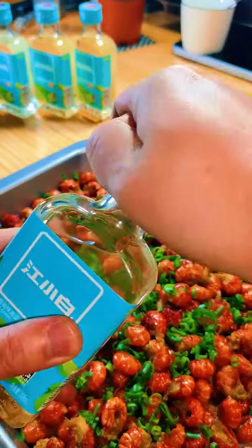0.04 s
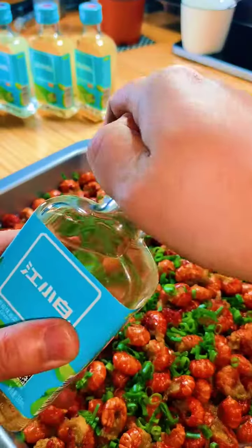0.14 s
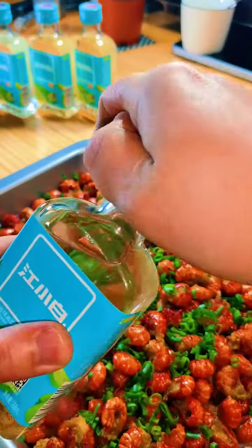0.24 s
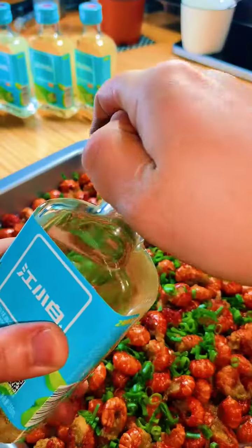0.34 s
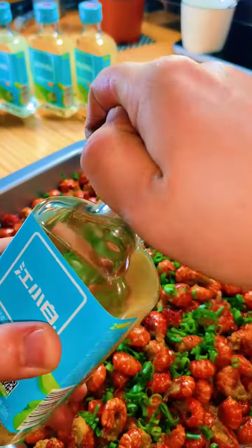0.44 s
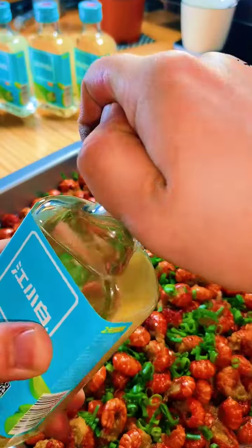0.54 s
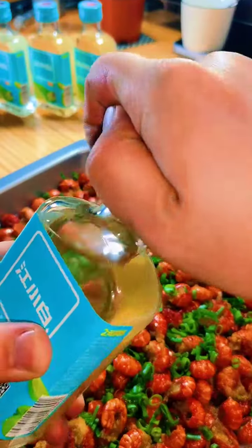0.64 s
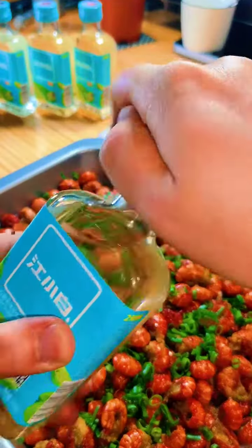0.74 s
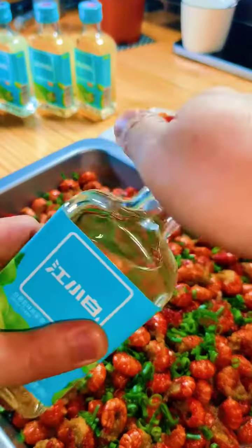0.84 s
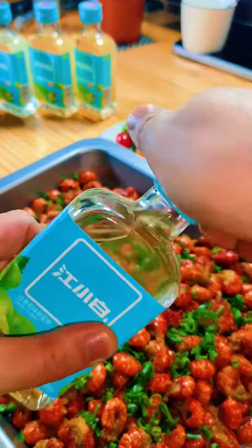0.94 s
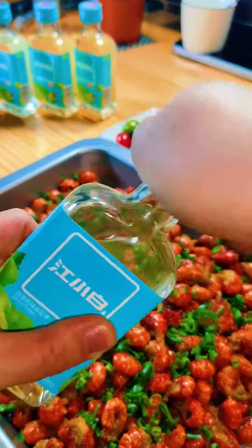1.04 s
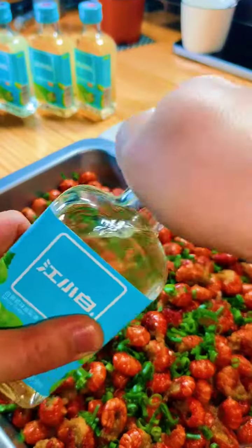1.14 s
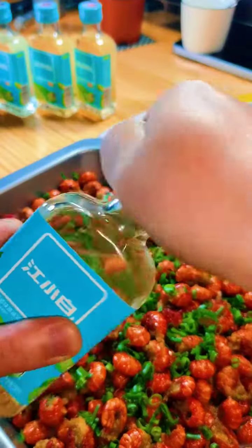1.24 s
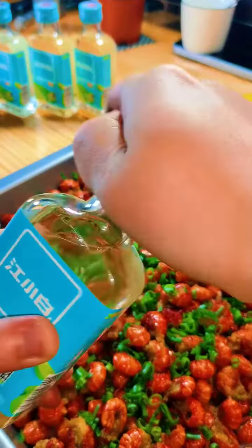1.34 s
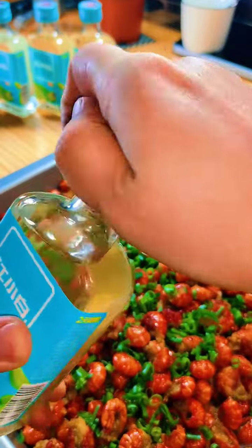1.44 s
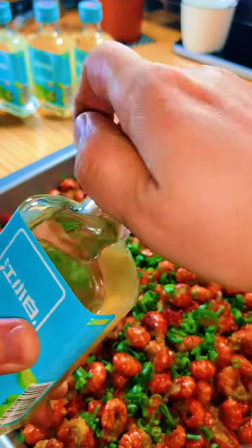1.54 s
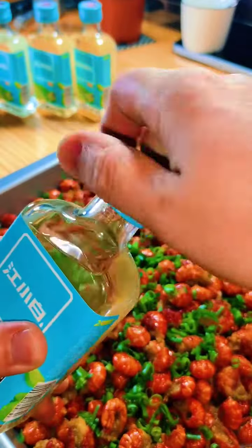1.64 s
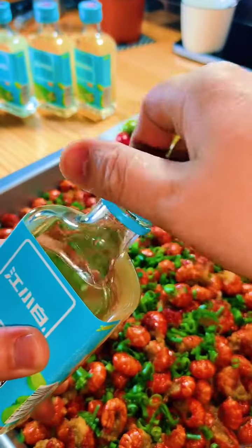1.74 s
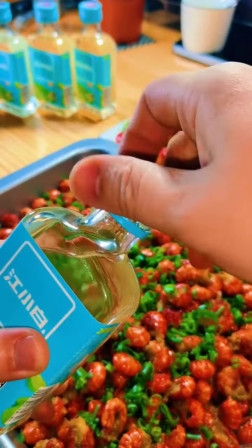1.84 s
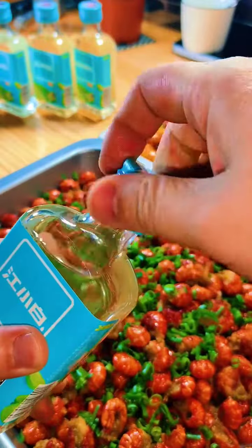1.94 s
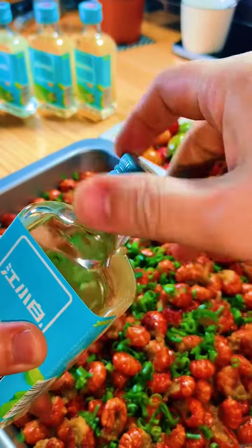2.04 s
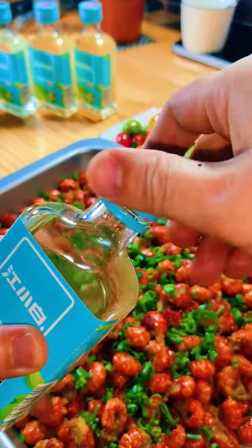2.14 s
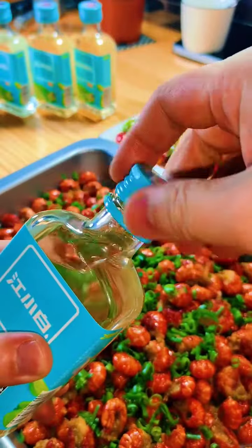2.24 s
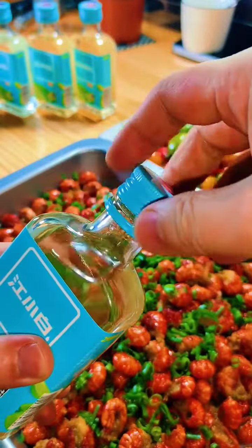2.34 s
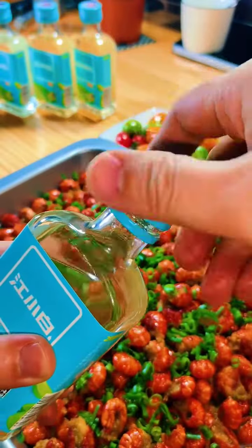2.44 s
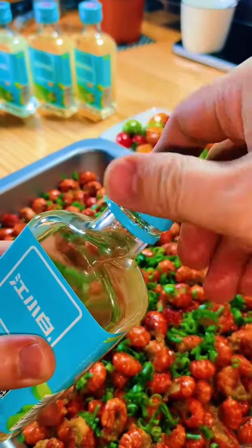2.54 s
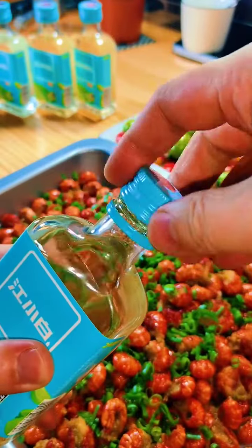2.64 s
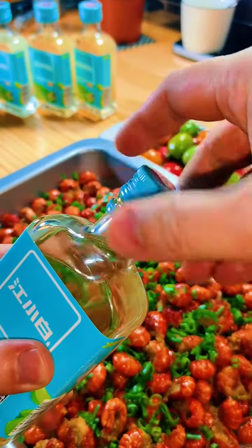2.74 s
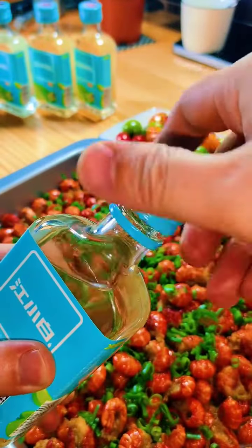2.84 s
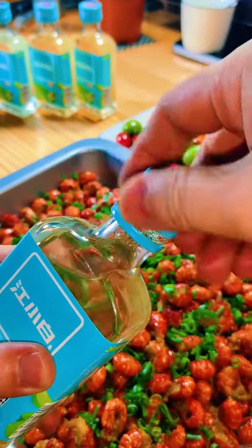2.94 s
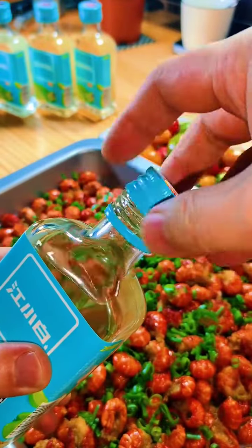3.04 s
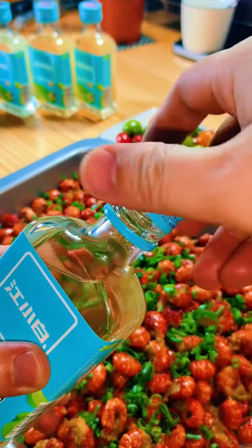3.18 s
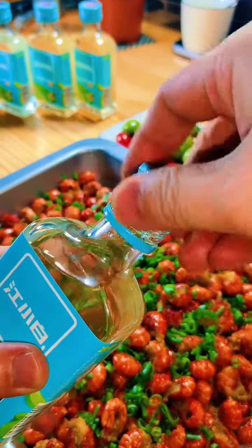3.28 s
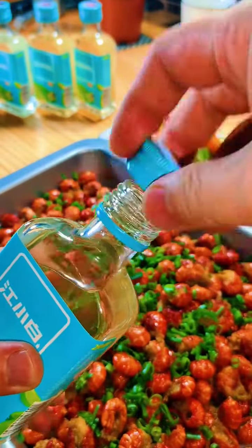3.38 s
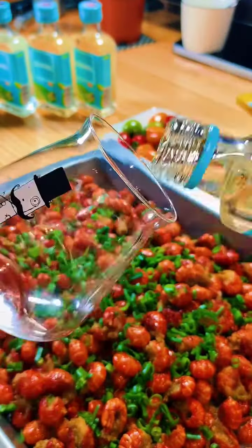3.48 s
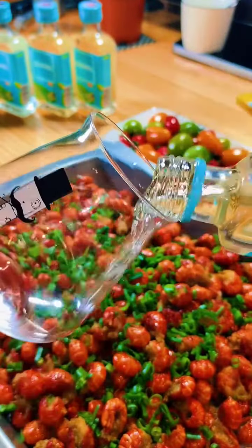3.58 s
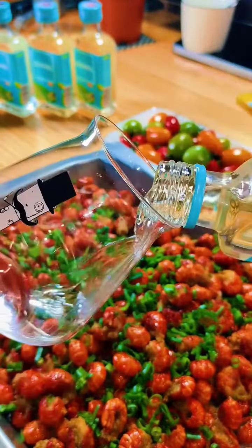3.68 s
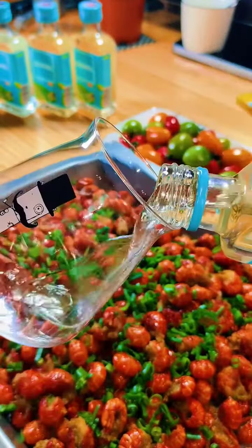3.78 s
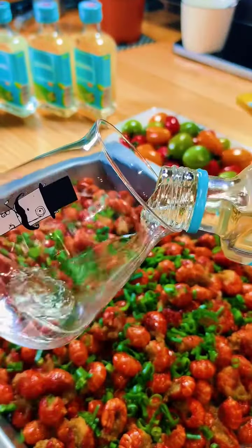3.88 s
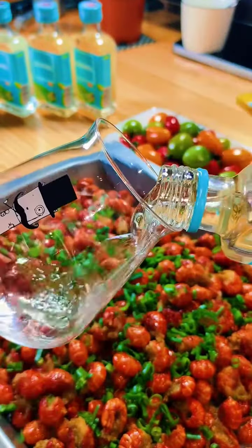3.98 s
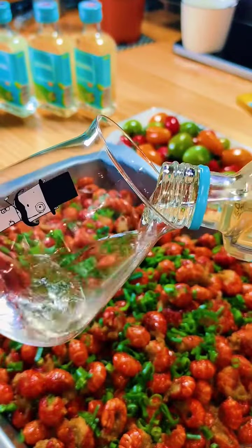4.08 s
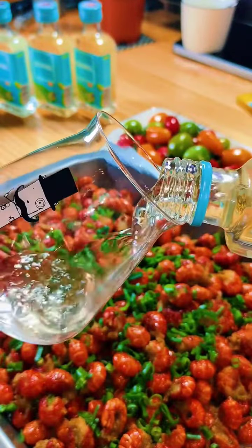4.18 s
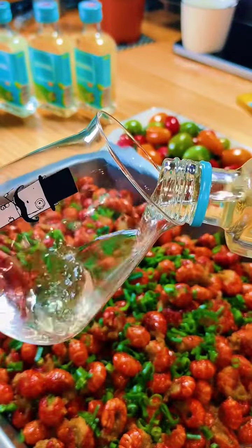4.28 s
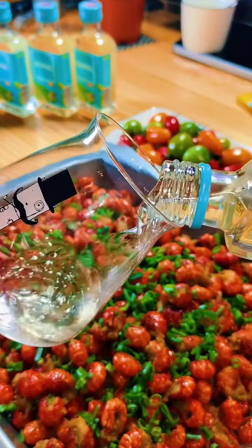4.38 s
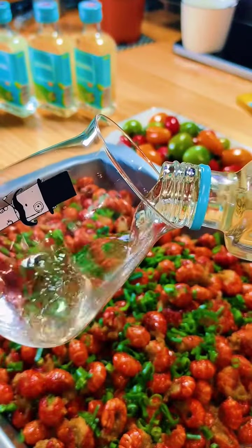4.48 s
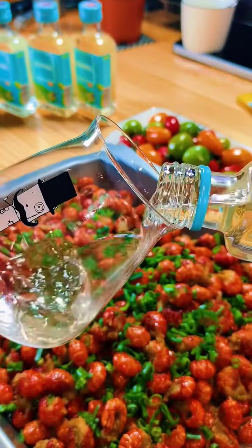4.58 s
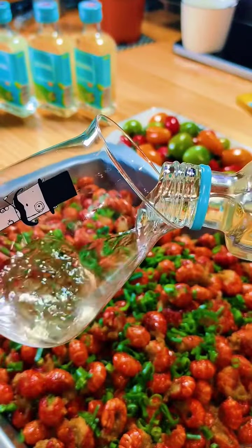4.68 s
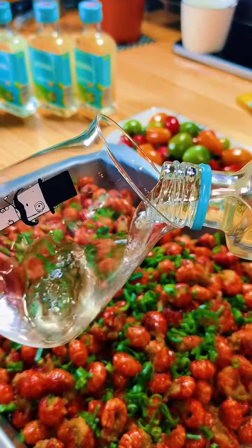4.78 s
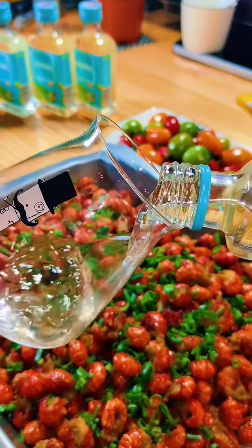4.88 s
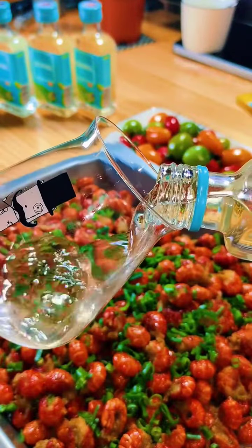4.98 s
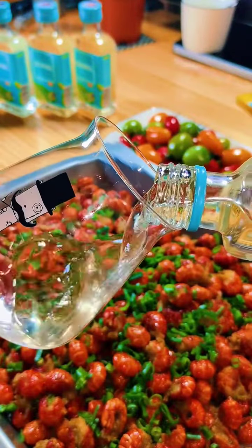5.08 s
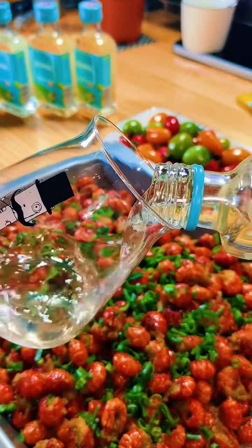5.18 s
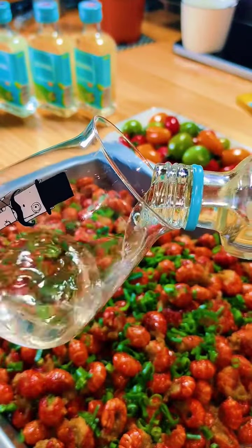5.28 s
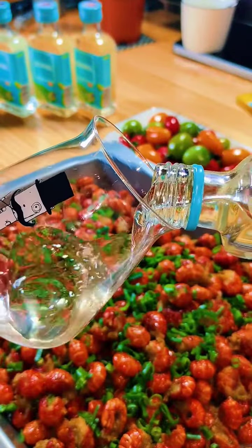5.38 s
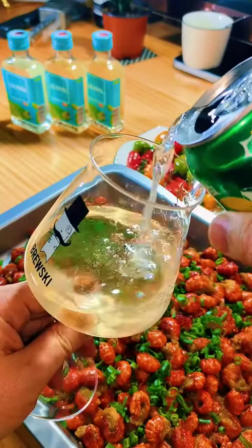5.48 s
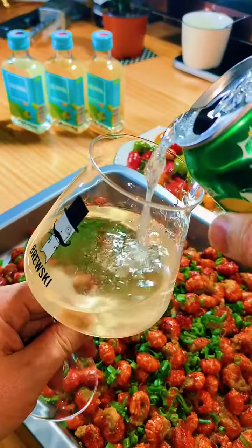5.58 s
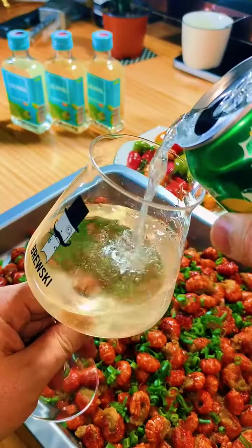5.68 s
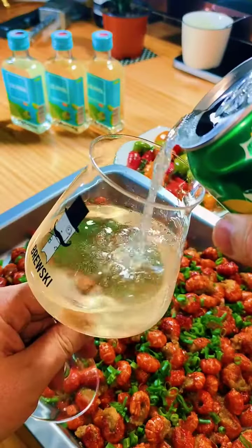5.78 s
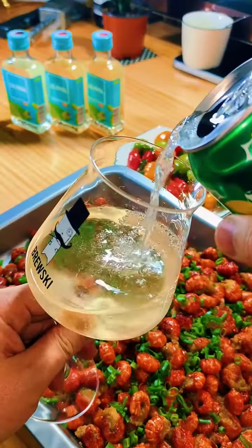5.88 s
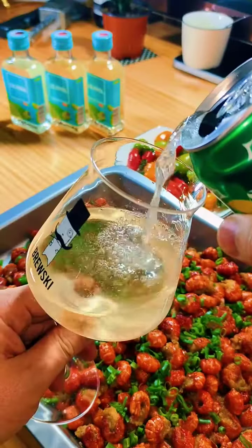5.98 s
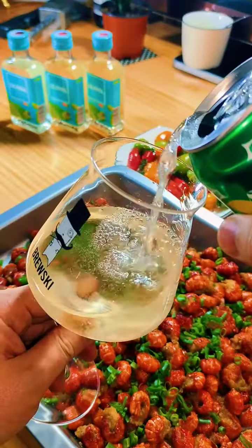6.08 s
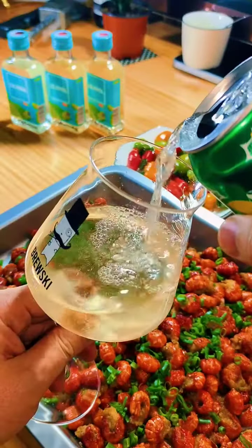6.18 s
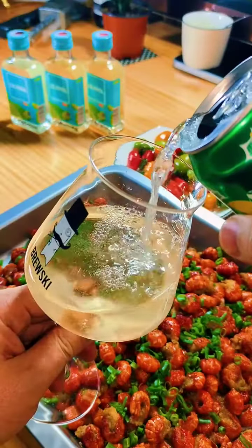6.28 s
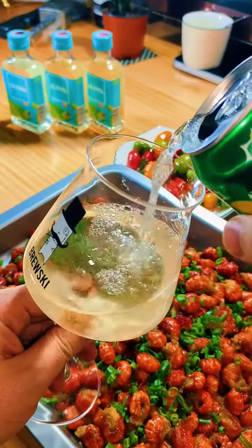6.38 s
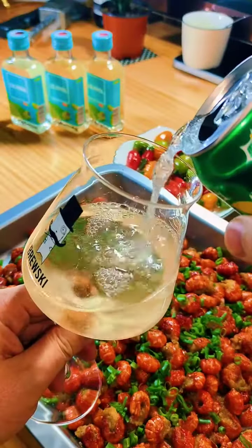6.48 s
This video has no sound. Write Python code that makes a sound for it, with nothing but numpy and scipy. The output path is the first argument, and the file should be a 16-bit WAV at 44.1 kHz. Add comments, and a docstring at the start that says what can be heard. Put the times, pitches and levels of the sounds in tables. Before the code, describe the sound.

Close stereo pickup in a hard, lively kitchen, with low rumble, faint hiss and soft hand rustle throughout. From 0.07 s the strained metal cap gives tiny dry ticks; loud seal snaps crack at 0.26, 0.37 and 0.54 s. Skin brushes faintly near 0.9 s, then a tight cluster of sharp snaps comes at 1.33-1.46 s. From 2 to 3.4 s looser, quieter clicks alternate with short gritty thread rasps, strongest around 3.13 s, with hollow cap knocks up to 3.4 s. At 3.64 s the bottle neck hits a glass: a loud, bright crack and wavering ring. Five soft low glugs, each rising in pitch, follow from 3.7 to 4.66 s, with sparse tiny glassy drips until 5 s. At 5.39 s a can lightly ticks the rim; from 5.47 s to the end fizzy drink splashes, gurgles and sizzles in uneven surges, gradually growing.

```python
"""A metal screw cap is twisted off a small glass bottle close by: snaps, a rasping thread, hollow knocks.
Bursts of noise form the snaps; swarms of damped sines form the rasp; decaying modes ring as the neck
clinks on a drinking glass. The bottle glugs five times in tones of rising pitch, with sparse drips.
A can ticks on the rim and a fizzy drink splashes into the filled glass as bubble tones and grains.
Room rumble, rustling hands, low hums and hiss lie beneath; a limiter holds down the loudest moments."""
import sys
import numpy as np
from scipy import signal
from scipy.fft import rfft, irfft, next_fast_len
from scipy.io import wavfile
from scipy.ndimage import uniform_filter1d, minimum_filter1d, map_coordinates

SR = 44100
rng = np.random.default_rng(int(sys.argv[2]) if len(sys.argv) > 2 else 0)


def persist_wave(psi):
    """Save psi, clipped to +-1, as 16-bit WAV."""
    counts = np.round(np.clip(psi, -1, 1) * 32767).astype(np.int16)
    wavfile.write(sys.argv[1], SR, np.atleast_2d(counts).T)


N = 287532

TOP_HZ = 15700  # upper edge of the band
CAP_END_S, POUR_START_S = 3.468, 5.474

# Low room rumble, rustle of hands and faint hiss, as spectra: pitch_hz, level_db
RUMBLE_SPECTRUM = [(12, -33), (20, -3.5), (33, 1.5), (59, 1.5), (80, 0.5), (108, -1.5), (160, -8),
                   (210, -37.5), (350, -120)]
RUSTLE_SPECTRUM = [(65, -35.5), (110, -5), (194, 1.5), (311, -6), (436, -14), (543, -16.5), (868, -14.5),
                   (1100, -26), (1500, -36), (1950, -64.5), (3300, -120)]
HISS_SPECTRUM = [(180, -33), (300, -3.5), (1170, -20.5), (1300, -26), (2210, -20), (2650, -16.5),
                 (3190, -26.5), (3950, -22.5), (7570, -37), (16000, -27.5)]
# Hands tightening or shifting their grip: loudest_s, level_db, half_length_s
GRIP_SHIFTS = [(.25, -51, .15), (.62, -57, .1), (1.2, -51, 0.29), (1.93, -52, 0.19), (3.15, -55.5, 0.27),
               (4.35, -64.5, .2), (6.2, -58.5, 0.42)]
# Dull low hums, from handling, and one echo of the last glug: loudest_s, level_db, pitch_hz, half_length_s
LOW_HUMS = [(1.85, -52.5, 183, 0.34), (2.995, -49, 79.2, 0.17), (4.748, -56, 306, 0.016),
            (5.362, -52, 33, 0.062)]
ROOM_RUMBLE_DB, ROOM_AIR_DB, HISS_DB = -62.5, -69, -66
GRIP_RUMBLE_DB = -3  # against the rustle

# Decay of the hard-walled kitchen: pitch_hz, t60_s
WALL_DECAY = [(200, 0.31), (1000, 0.52), (3000, 0.39), (6000, 0.4), (10000, 0.31), (15000, 0.25)]
# Strength of the walls' answer: pitch_hz, level_db
WALL_STRENGTH = [(200, 7.5), (800, -5.5), (2000, 0), (5000, -1), (10000, 2.5), (15000, 2.5)]

# Small ticks of the strained metal: start_s, level_db, pitch_hz
METAL_CREAKS = [(.0732, -41.5, 5900), (.1156, -36, 4190), (.1431, -28.5, 2012), (.1695, -37.5, 1907),
                (.2279, -27, 1950), (.4928, -28, 1966), (.66, -25, 5550), (1.2231, -29.5, 6230),
                (1.2695, -26.5, 5220), (1.6297, -35.5, 2980), (1.7489, -37, 2670), (1.8701, -40, 2840)]
# Snaps of the seal and catches of the thread: start_s, level_db, knock_db, body_db, treble_db
SEAL_SNAPS = [(0.2643, 1, -26, -18.5, -15.5), (0.3729, -1, -24, -19, -14.5), (0.5449, 3.5, -34, -17.5, -7),
              (1.334, 4, -31, -16, -18.5), (1.3408, 0, -24.5, -8, -15), (1.3943, 1.5, -21, -9.5, -17.5),
              (1.411, 0, -21, -6.5, -12), (1.4573, -10, -24.5, -20, -17.5), (2.0079, -20.5, -14, -7, -10.5),
              (2.0831, -25, -35, -19, -14), (2.2272, -23, -13, -6, -19), (2.5561, -10, -20, -19, -17.5),
              (2.7568, -26, -23, -17.5, -16), (2.9445, -13, -8, -7, -23), (2.9505, -16, -10, -12, -19),
              (3.1215, -9, -32, -13, -22), (3.1312, -6, -24, -18, -12), (3.1375, -7.5, -15, -11, 10),
              (3.147, -16.5, -7, -11, 4.5)]
# The looser the cap, the longer it rings: t60 at 0 s, and its growth per second
TIGHT_T60_S, T60_GROWS_S_PER_S = .011, 0.0057
# Fingers sliding on the cap, as a spectrum: pitch_hz, level_db
SKIN_SPECTRUM = [(400, -10), (950, 3), (1300, -8), (2700, -3), (4500, -7), (5700, 0), (7000, -9),
                 (8700, -7), (10500, -19), (15000, -14)]
SLIDE_S, SLIDE_DB, SLIDE_HALF_S = .89, -57, .075  # taking a new grip
# Turns of the cap rubbing on the thread: loudest_s, level_db, half_length_s
THREAD_RASPS = [(1.968, -56.5, .06), (2.047, -48.5, 0.031), (2.337, -44, .03), (2.605, -45, .027),
                (2.703, -43, .016), (3.036, -35, .024), (3.139, -29, .012), (3.382, -43, 0.015)]
# Metal slipping on the glass thread, as a spectrum: pitch_hz, level_db
THREAD_SPECTRUM = [(600, -10), (1100, -8.5), (1500, -19.5), (2200, -6.5), (2750, 1), (3200, -4),
                   (4200, -7.5), (5400, 2), (6500, -0.5), (7300, 3), (10000, -18.5)]
# Air inside the cap, as a spectrum: pitch_hz, level_db
CAP_AIR_SPECTRUM = [(250, -33.5), (550, -12), (780, -3.5), (950, 2.5), (1250, -5.5), (1900, -20.5)]
RASP_HOLLOW_DB, RASP_GRIT_DB = -8.5, -7  # against the slips
# Hollow knocks of the loose cap on the neck: start_s, level_db, pitch_hz
CAP_KNOCKS = [(3.132, -23.5, 742), (3.141, -24.5, 760), (3.2985, -31.5, 806), (3.393, -32.5, 810)]

# Droplets and light touches on the glass: start_s, level_db, pitch_hz
GLASS_DRIPS = [(3.602, -47.5, 3650), (4.1524, -37, 4080), (4.2268, -42.5, 3760), (4.2752, -44, 6900),
               (4.4298, -50, 3760), (4.685, -46, 2650), (4.7376, -47, 5810), (4.9048, -44, 6750),
               (4.925, -46, 3930), (5.0105, -47, 2670)]
# Blows on the rim: start_s, level_db, pitch_factor
RIM_BLOWS = [(3.643, 5.5, 1), (5.388, -50, 1)]
# Modes of the struck glass: pitch_hz, level_db (against the blow), t60_s, left_right_db
GLASS_MODES = [(583, -25, 0.29, 4), (952, -19, 0.5, -9), (1714, -22.5, 0.24, 1), (1802, -32.5, .2, 2.5),
               (1990, -27.5, .2, -7), (2755, -4.5, 0.37, -13), (2701, -25, 0.6, 11.5),
               (2750, -21, 0.36, -8.5), (3900, -24.5, .3, 4.5), (4060, -18, 0.33, 0.5),
               (4150, -20.5, 0.2, 1.5), (4425, -26, 0.093, 8.5), (4500, -32.5, 0.24, -4),
               (5400, -32, 0.2, 7), (7030, -27, .24, -1), (7140, -24, 0.22, 1.5), (8850, -24.5, 0.19, 0),
               (8700, -30, 0.22, -7), (10280, -37.5, 0.13, -5), (12200, -26.5, 0.23, -10),
               (14110, -18, .17, 5), (15020, -23.5, .17, 2.5)]
# Crack of glass on glass, as a spectrum: pitch_hz, level_db
CRACK_SPECTRUM = [(300, -24.5), (600, 3.5), (1300, -5.5), (2000, 2), (3300, -6.5), (4200, 10.5),
                  (5200, -8.5), (7000, -6), (10000, -16.5), (13000, -4.5), (15500, -10.5)]
# Air gulped into the bottle: loudest_s, level_db, pitch_hz (at the loudest), half_length_s
AIR_GULPS = [(3.715, -36.5, 193, .017), (3.93, -31, 231, 0.013), (4.177, -32.5, 229, 0.0157),
             (4.379, -33.5, 207, 0.0111), (4.66, -36.5, 166, 0.01)]
GLUG_OCTAVES = 0.44  # rise of pitch per half-length, at the loudest moment

# Modes of the can touching the rim: pitch_hz, level_db, t60_s
CAN_MODES = [(2680, -42, .13), (3800, -20.5, .052), (4600, -49, .14), (6500, -45, .06)]
CAN_TOUCH_S = 5.3895
# Small bubbles in the drink, as a spectrum: pitch_hz, level_db
LIQUID_SPECTRUM = [(710, -39), (1200, -11.5), (1700, -20), (2040, -34.5), (2510, 5), (2860, -4.5),
                   (3590, -5), (4310, -23.5), (4700, -6.5), (5350, 0.5), (7170, -10), (8000, -6),
                   (11200, -32), (14700, -16.5), (16000, -25)]
# Air above the drink, as a spectrum: pitch_hz, level_db
HOLLOW_SPECTRUM = [(300, -43), (480, -34.5), (590, 3.5), (700, -0.5), (880, 6.5), (1020, 9.5), (1200, -11),
                   (1800, -17.5), (3000, -52)]
# Largest bursts of spray: start_s, level_db, pitch_hz (of the bubble)
SPRAY_BURSTS = [(5.4831, -24.5, 2960), (5.5522, -24, 2650), (5.62, -22.5, 4810), (5.6454, -22, 2500),
                (5.7123, -24.5, 5530), (5.8789, -23, 5480), (5.9332, -26, 2650), (5.9586, -26, 2670),
                (6.0004, -24.5, 5380), (6.0676, -26.5, 5390), (6.21, -24.5, 2990), (6.2451, -19, 5670),
                (6.3328, -27, 2490), (6.4085, -27, 2700), (6.4503, -19, 5330)]
# Largest bubbles: start_s, level_db, pitch_hz
LARGE_BUBBLES = [(5.479, -16.5, 750), (5.646, -22, 604), (5.700, -17.5, 985), (5.879, -15, 904),
                 (5.888, -17, 968), (5.886, -20, 596), (6.005, -20, 683), (6.099, -16.5, 703),
                 (6.3055, -13, 700), (6.4055, -15, 714)]
# Air above the drink set ringing by a bubble: pitch_hz, level_db (against the bubble), t60_s
GLASS_AIR_MODES = [(591, -22, 0.2), (691, -20.5, 0.12), (873, -13, 0.18)]
PLOP_T60_S = .05
# The stream from the can settles quickly, then keeps growing as the can tilts
FLOW_START_DB, FLOW_SETTLE_S, FLOW_DB_PER_S = -9, .08, 5
GURGLE_DB, SPLASH_DB, FIZZ_DB = -43, -48.5, -56  # layers of the stream, before its growth
SPRAY_PER_S, SPRAY_DB, SPRAY_HZ = 12, -31.5, 2750  # lesser bursts: rate, mean level, median pitch
SPRAY_TREBLE_DB = -14  # fizz of a burst against its level


def amp(db):
    """Logarithmic level: decibels become a linear gain."""
    return 10 ** (np.asarray(db) / 20)


def unit(x):
    """Normalisation of power: scale to rms 1."""
    return x / np.sqrt(np.mean(x ** 2) + 1e-20)


def along(points, hz):
    """Logarithmic frequency: interpolate (Hz, value) points on a log axis."""
    f, v = np.transpose(points)
    return np.interp(np.log(hz + 1), np.log(f + 1), v)


def fade(t, t60):
    """Exponential damping: decay by 60 dB in t60 seconds."""
    return np.exp(-np.log(1000) * t / np.maximum(t60, 1e-4))


def swell(t, half_length):
    """Gaussian envelope: a bell-shaped rise and fall around t = 0."""
    return np.exp(-(t / half_length) ** 2 / 2)


def pan(db):
    """Level difference between the ears: gains of left and right, positive to the left."""
    return amp([[db / 2], [-db / 2]])


def add(track, s, sound):
    """Superposition: mix a sound into a track at s seconds."""
    start = max(round(s * SR), 0)
    part = track[:, start:start + sound.shape[-1]]
    part += sound[..., :part.shape[-1]]


def colour(x, spectrum):
    """Linear filtering: x shaped by (Hz, dB) points, then set to rms 1."""
    n = x.shape[-1]
    m = next_fast_len(n + 2048, real=True)
    gain = amp(along(spectrum, np.fft.rfftfreq(m, 1 / SR)))
    return unit(irfft(rfft(x, m) * gain, m)[..., :n])


def noise(spectrum, alike, size=N):
    """Partial coherence: coloured stereo noise with a share of power common to both sides."""
    share = np.clip(alike, 0, 1)
    white = rng.standard_normal((3, size))
    return colour(np.sqrt(share) * white[0] + np.sqrt(1 - share) * white[1:], spectrum)


def grains(t0, t1, rate, hz, spread, cycles, size_db, rise, size):
    """Random superposition: damped sines of random pitch and strength, phased apart in each channel."""
    count = int(rate * (t1 - t0))
    when = rng.uniform(t0, t1, (count, 1))
    strength = np.minimum(rng.exponential(size=(count, 1)), 3.5)
    pitch = hz * np.exp(spread * rng.standard_normal((count, 1)))
    age = pitch * np.arange(size) / SR / cycles  # in decay times
    envelope = np.exp(-age) * (1 - np.exp(-10 * age))
    body = (pitch < TOP_HZ) * amp(size_db * strength) * envelope
    phase = 2 * np.pi * cycles * (age + rise * (age - 1 + np.exp(-age)))  # the pitch glides up by rise
    index = ((when * SR).astype(int) + np.arange(size)).ravel()
    turns = rng.normal(0, 0.8, (2, count, 1))
    return np.array([np.bincount(index, (body * np.sin(phase + turn)).ravel(), N)[:N] for turn in turns])


def pings(rows, ping_db, ping_t60, spray_db, spray_t60, treble_db, rise):
    """Impulsive excitation: each contact or drop is a puff of noise and a short tone, gliding by rise."""
    out, t = np.zeros((2, N)), np.arange(SR // 14) / SR
    spectrum = [(900, -16.5), (2000, -6.0), (2600, 4), (3600, -9.5), (5500, 0.5),
                (8000, treble_db + 3.0), (15000, treble_db), (16500, treble_db - 20.5)]
    onset = 1 - np.exp(-t / 0.00077)
    for s, db, hz in rows:
        phase = 2 * np.pi * hz * t * (1 + rise * t) + rng.normal(0, 0.62, (2, 1))
        ping = np.sin(phase) * fade(t, ping_t60)
        spray = noise(spectrum, alike=0.12, size=len(t)) * fade(t, spray_t60)
        add(out, s, amp(db) * (amp(ping_db) * ping + amp(spray_db) * spray) * onset)
    return out


def ringing(modes, t):
    """Modal superposition: decaying (Hz, dB, t60) modes, phased apart in each channel."""
    out = 0
    for hz, db, t60 in modes:
        phase = 2 * np.pi * hz * t + rng.normal(0, 0.99, (2, 1))
        out = out + amp(db) * np.sin(phase) * fade(t, t60)
    return out


def kitchen(x):
    """Reverberation: hard walls answer as a noise tail in which each frequency dies at its own speed."""
    hz, t, z = signal.stft(rng.standard_normal((2, SR * 2 // 3)), SR, nperseg=256)
    shape = fade(t, along(WALL_DECAY, hz)[:, None]) * amp(along(WALL_STRENGTH, hz))[:, None]
    tail = signal.istft(z * shape, SR, nperseg=256)[1]
    tail = tail * (1 - np.exp(-np.arange(tail.shape[1]) / SR / 0.002))
    return signal.fftconvolve(x, tail / np.linalg.norm(tail[0]), axes=1)[:, :N]


def background():
    """Addition of powers: room rumble and hiss, with the dull rustle of hands on the bottle and low hums."""
    seconds = np.arange(N) / SR
    grip = sum(amp(db) * swell(seconds - s, length) for s, db, length in GRIP_SHIFTS)
    rumble_level = np.hypot(amp(ROOM_RUMBLE_DB), amp(GRIP_RUMBLE_DB) * grip)
    rumble = rumble_level * noise(RUMBLE_SPECTRUM, alike=0.52)
    rustle = np.hypot(amp(ROOM_AIR_DB), grip) * noise(RUSTLE_SPECTRUM, alike=0.82)
    out = rumble + rustle + amp(HISS_DB) * noise(HISS_SPECTRUM, alike=0.12)
    t = np.arange(-SR // 2, SR // 2) / SR
    for s, db, hz, length in LOW_HUMS:
        band = [(hz / 2, -45), (hz, 0), (hz * 2, -45), (hz * 10, -100)]
        add(out, s + t[0], amp(db) * swell(t, length) * noise(band, alike=0.97, size=len(t)))
    return out


def creaks():
    """Release of strain: the stressed metal gives small dry ticks."""
    return pings(METAL_CREAKS, ping_db=-3, ping_t60=.01, spray_db=-1, spray_t60=.014, treble_db=-18, rise=0)


def seal():
    """Fracture: the seal's bridges snap one by one, then the thread catches as the cap works loose."""
    snaps, t = np.zeros((2, N)), np.arange(SR // 14) / SR
    onset = 1 - np.exp(-t / 0.0009)
    for s, db, knock_db, body_db, treble_db in SEAL_SNAPS:
        t60 = TIGHT_T60_S + T60_GROWS_S_PER_S * s
        shell = [(120, knock_db - 14.5), (750, knock_db + 11.0), (1250, knock_db + 4.0),
                 (1850, body_db + 5), (3000, body_db + 5.5),
                 (4000, -9.5), (5300, -4), (7500, -11.0),
                 (10500, treble_db - 1), (14800, treble_db + 8.5), (16500, treble_db - 16.5)]
        add(snaps, s, amp(db - 3.5) * noise(shell, alike=0.27, size=len(t)) * fade(t, t60) * onset)
    return snaps + amp(-5.5) * kitchen(snaps)


def fingers():
    """Sliding friction: skin brushes softly along the cap's knurling."""
    stroke = swell(np.arange(N) / SR - SLIDE_S, SLIDE_HALF_S)
    return amp(SLIDE_DB) * stroke * noise(SKIN_SPECTRUM, alike=.3)


def thread():
    """Stick-slip friction: thin metal sticks and slips on the glass thread at each turn of the fingers."""
    slips = grains(0, CAP_END_S, rate=3000, hz=2810, spread=0.43, cycles=8.6, size_db=4.5, rise=0, size=160)
    slips = colour(slips, THREAD_SPECTRUM)
    grit = grains(0, CAP_END_S, rate=6300, hz=12100, spread=1.0, cycles=1.8, size_db=4.0, rise=0, size=48)
    grit = colour(grit, [(6000, -23), (9000, -2.5), (11000, -17), (14500, 1.5)])
    hollow, t = noise(CAP_AIR_SPECTRUM, alike=0.89), np.arange(N) / SR
    stroke = sum(amp(db) * swell(t - s, length) for s, db, length in THREAD_RASPS)
    out = stroke * (slips + amp(RASP_HOLLOW_DB) * hollow + amp(RASP_GRIT_DB) * grit)
    return out + amp(-8.5) * kitchen(out)


def hollow_knocks():
    """Cavity resonance: the loose cap knocks on the neck and its hollow sounds."""
    return pings(CAP_KNOCKS, ping_db=4.5, ping_t60=0.036, spray_db=-5, spray_t60=.035, treble_db=-25,
                 rise=-0.66)


def cap():
    """Superposition of the cap's sounds, set a little to the left and ended together."""
    contacts = creaks() + hollow_knocks()
    sound = seal() + thread() + contacts + amp(-3.5) * kitchen(contacts)
    return sound * pan(2.6) * (np.arange(N) < CAP_END_S * SR)


def drips():
    """Impact of drops: sparse ticks while the spirit slides quietly down the glass's wall."""
    ticks = pings(GLASS_DRIPS, ping_db=-2.5, ping_t60=0.044, spray_db=-9.0, spray_t60=.045, treble_db=-2.5,
                  rise=0)
    return ticks + amp(-5.5) * kitchen(ticks)


def clink():
    """Modal vibration: a crack sets off modes which waver at random, close pairs beating together."""
    ring, crack, t = np.zeros((2, N)), np.zeros((2, N)), np.arange(SR * 2 // 3) / SR
    onset = 1 - np.exp(-t / 0.0012)
    for s, blow_db, pitch in RIM_BLOWS:
        for hz, db, t60, side_db in GLASS_MODES:
            # a smooth random drift of phase
            waver = map_coordinates(rng.standard_normal(64), [t * 70], mode="mirror")
            phase = rng.uniform(0, 2 * np.pi) + rng.normal(0, .4, (2, 1))
            phase = phase + .35 * np.sqrt(hz / 2745) * waver
            mode = np.sin(2 * np.pi * hz * pitch * t + phase) * fade(t, t60) * onset
            add(ring, s, amp(blow_db + db) * pan(side_db) * mode)
        decay = amp(1.5) * fade(t, 0.0069) + amp(-14.5) * fade(t, 0.31)
        add(crack, s, amp(blow_db) * noise(CRACK_SPECTRUM, alike=0.067, size=len(t)) * decay)
    return ring + crack + kitchen(amp(-21) * ring + amp(-15.0) * crack)


def glugs():
    """Resonance of gulped air: it swells and rises in pitch on entering; short gulps rise faster."""
    out, t = np.zeros((2, N)), np.arange(-SR // 12, SR // 12) / SR
    for s, db, hz, length in AIR_GULPS:
        pitch = 2 * hz / (1 + 2 ** (-2 * GLUG_OCTAVES * t / length))
        tone = np.sin(2 * np.pi * np.cumsum(pitch) / SR)
        add(out, s + t[0], amp(db) * swell(t, length) * tone)
    return out + amp(-12.5) * kitchen(out)


def can():
    """Impact excitation: the can is set against the rim with a light tick that rings its modes."""
    out, t = np.zeros((2, N)), np.arange(SR // 4) / SR
    spectrum = [(1200, -36), (2600, 3), (5000, -6), (8000, -14), (12000, -30)]
    tick = amp(-34.5) * noise(spectrum, alike=0.17, size=len(t)) * fade(t, 0.017)
    add(out, CAN_TOUCH_S, (ringing(CAN_MODES, t) + tick) * (1 - np.exp(-t / 0.0011)))
    return out + amp(-10.5) * kitchen(out)


def plops():
    """Coupled resonance: a large bubble rings briefly and wakes the air in the glass."""
    out, t = np.zeros((2, N)), np.arange(SR // 5) / SR
    for s, db, hz in LARGE_BUBBLES:
        modes = [(hz, 1, PLOP_T60_S)] + list(GLASS_AIR_MODES)
        add(out, s, amp(db) * ringing(modes, t) * (1 - np.exp(-t / 0.0036)))
    return out * pan(3.4)


def pour():
    """Bubble entrainment: large bubbles gurgle in the glass's hollow, small ones splash and fizz in surges."""
    end, t = N / SR, np.arange(SR // 5) / SR
    age = np.maximum(np.arange(N) / SR - POUR_START_S, 0)
    flow = amp(FLOW_START_DB * np.exp(-age / FLOW_SETTLE_S) + FLOW_DB_PER_S * age)
    duty = np.sqrt(1 - POUR_START_S / end)  # brings the layers to rms 1 within the pour alone
    gurgle = grains(POUR_START_S, end, rate=130, hz=780, spread=.3, cycles=9, size_db=2, rise=.06, size=2200)
    gurgle = colour(gurgle, HOLLOW_SPECTRUM)
    splash = grains(POUR_START_S, end, rate=1300, hz=3800, spread=.55, cycles=9, size_db=4.5, rise=.05,
                    size=560)
    splash = colour(splash, LIQUID_SPECTRUM)
    fizz = grains(POUR_START_S, end, rate=1400, hz=11100, spread=0.38, cycles=1.4, size_db=6.5, rise=0.044,
                  size=80)
    fizz = colour(fizz, [(5000, -7.5), (9000, -5.5), (11000, -8.5), (15000, 2.5)])

    # each lump of the stream that lands releases a crowd of small bubbles
    bursts = list(SPRAY_BURSTS)
    for _ in range(round(SPRAY_PER_S * (end - POUR_START_S))):
        s, db = rng.uniform(POUR_START_S, end), SPRAY_DB + rng.normal(0, 2.5)
        bursts.append((s, db, SPRAY_HZ * np.exp(rng.normal(0, .2))))
    surge, lump = np.zeros((2, N)), (t / .004) * np.exp(1 - t / .004)  # rows: splash, fizz
    for s, db, hz in bursts:
        add(surge, s - .002, amp([[db - 9], [db + SPRAY_TREBLE_DB]]) * lump)
    stream = amp(GURGLE_DB) * flow * gurgle
    stream = stream + (amp(SPLASH_DB) * flow + surge[0]) * splash
    stream = stream + (amp(FIZZ_DB) * flow + surge[1]) * fizz * pan(3)

    # every lump leaves a short train of bubbles of like size
    train = []
    for s, db, hz in bursts:
        for _ in range(3):
            later, weaker_db = s + rng.exponential(.005), db - rng.uniform(1, 7)
            train.append((later, weaker_db, hz * np.exp(rng.normal(0, .18))))
    bubbles = pings(bursts + train, ping_db=0.0, ping_t60=0.022, spray_db=-11.5, spray_t60=0.022,
                    treble_db=-17, rise=1.6)
    out = duty * stream + plops() + bubbles
    out[1] = np.roll(out[1], round(0.00021 * SR))  # the glass stands nearer the left: right arrives later
    return (out + amp(-3.0) * kitchen(out)) * pan(1.4)


def scene():
    """Superposition: cap, clink and the two pours over the kitchen's background."""
    return background() + cap() + fingers() + drips() + clink() + glugs() + can() + pour()


def record(dry):
    """Dynamic limiting: gain falls at the loudest moments, peaks clip and the top of the band is cut."""
    level = np.sqrt(np.abs(uniform_filter1d(np.mean(dry ** 2, axis=0), size=350)) + 1e-12)
    gain = minimum_filter1d(np.minimum(1, amp(-9.5) / level), size=200)
    gain = uniform_filter1d(gain, size=100)
    m = next_fast_len(N + SR // 8)
    passband = np.fft.rfftfreq(m, 1 / SR) < TOP_HZ
    return irfft(rfft(np.clip(dry * gain, -1, 1), m) * passband, m)[:, :N]


dry = scene()
out = record(dry)
persist_wave(out)
```